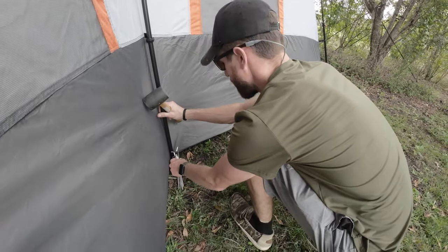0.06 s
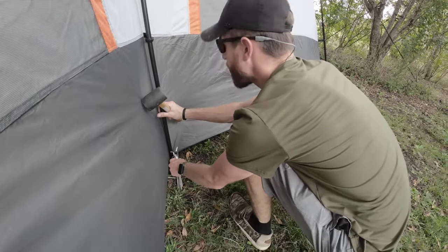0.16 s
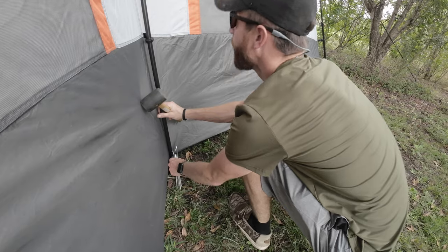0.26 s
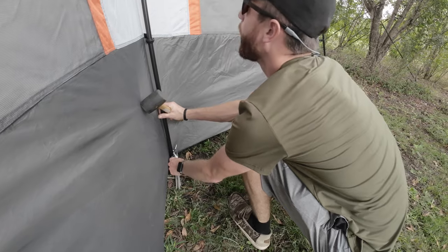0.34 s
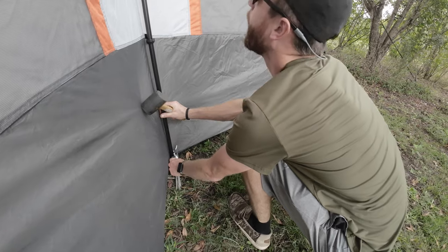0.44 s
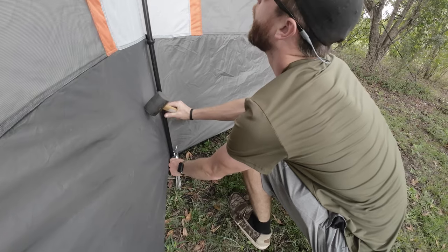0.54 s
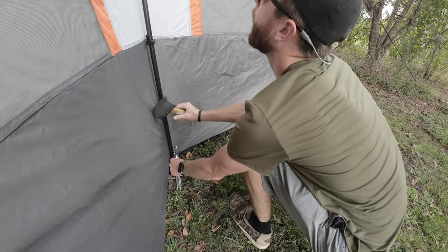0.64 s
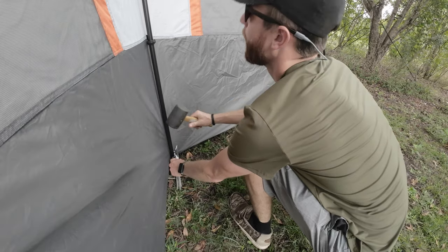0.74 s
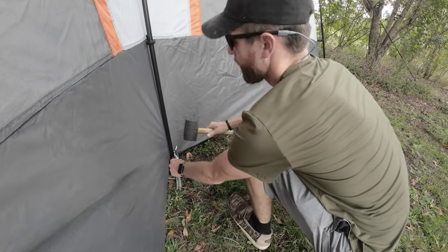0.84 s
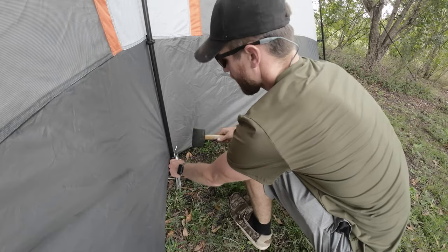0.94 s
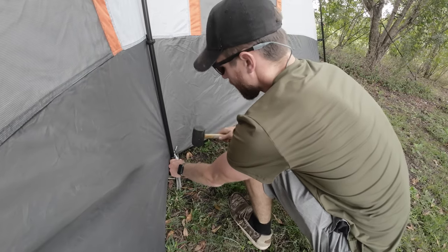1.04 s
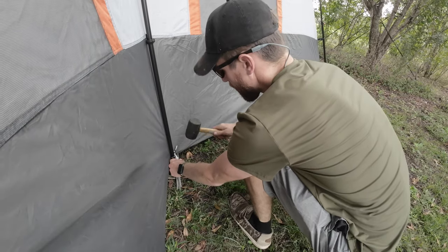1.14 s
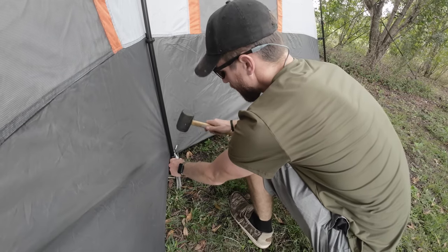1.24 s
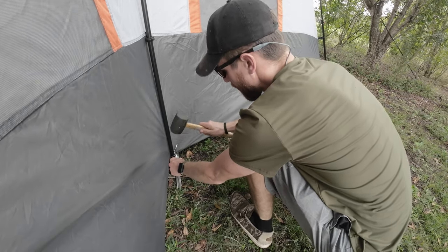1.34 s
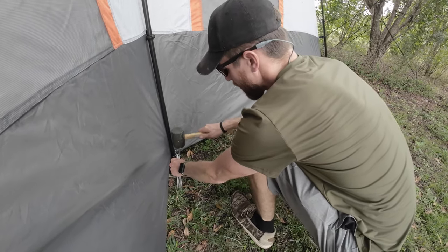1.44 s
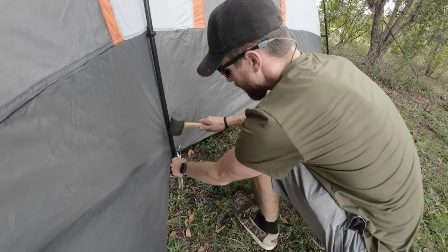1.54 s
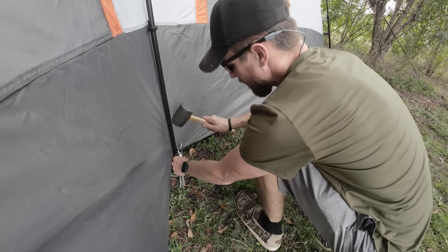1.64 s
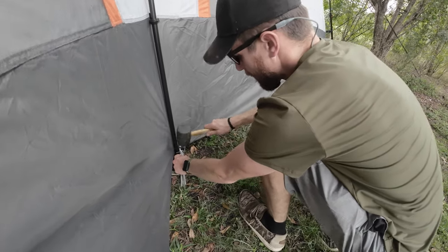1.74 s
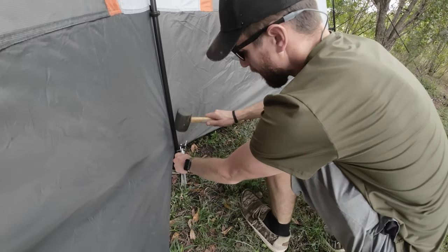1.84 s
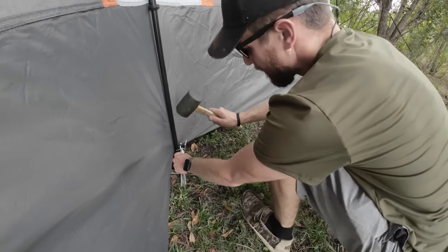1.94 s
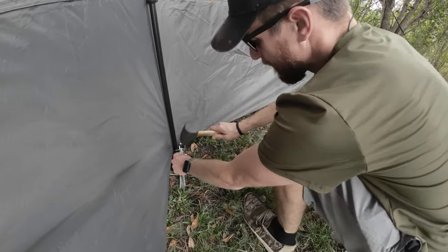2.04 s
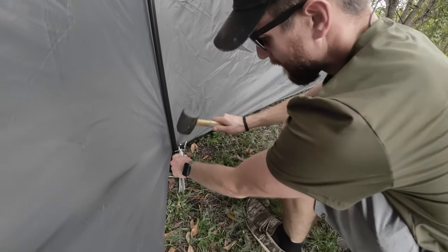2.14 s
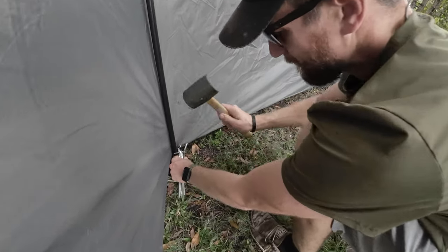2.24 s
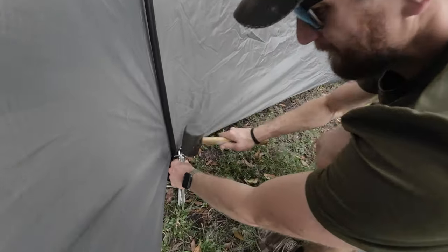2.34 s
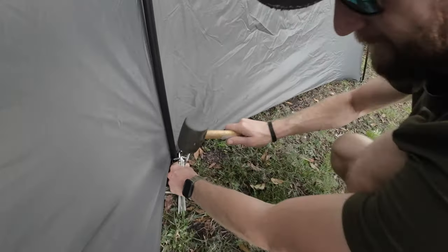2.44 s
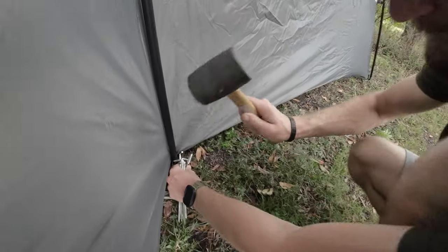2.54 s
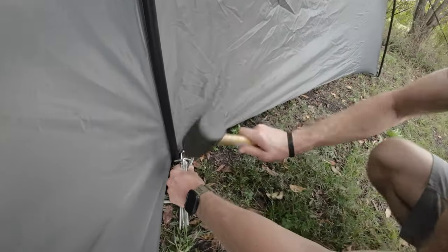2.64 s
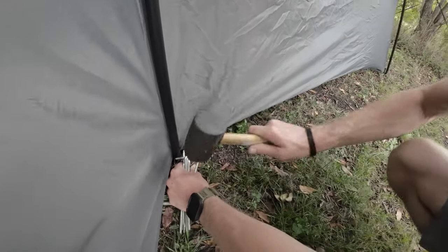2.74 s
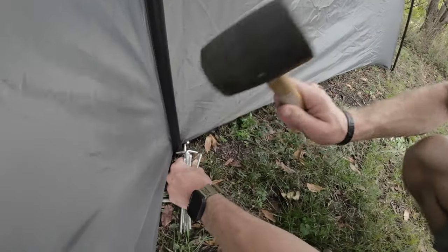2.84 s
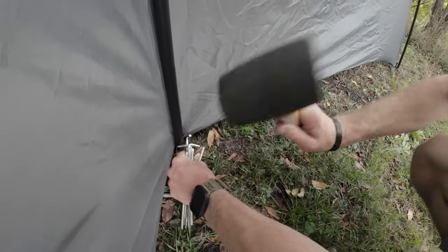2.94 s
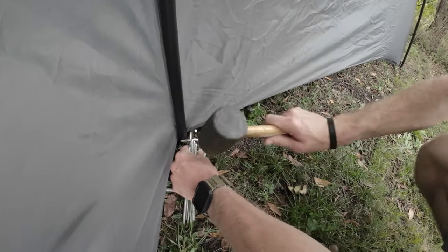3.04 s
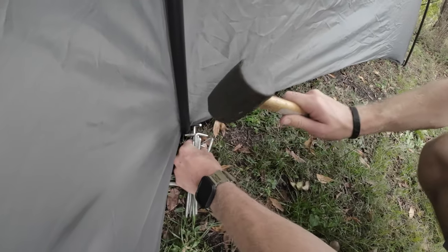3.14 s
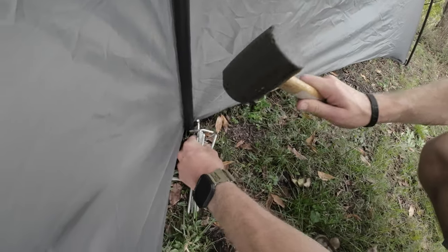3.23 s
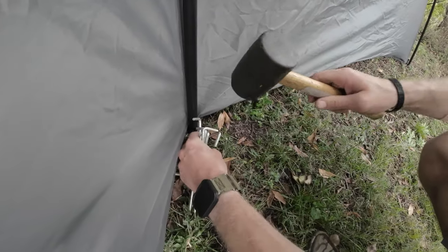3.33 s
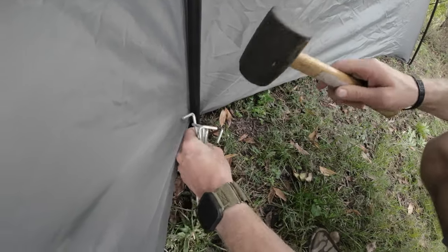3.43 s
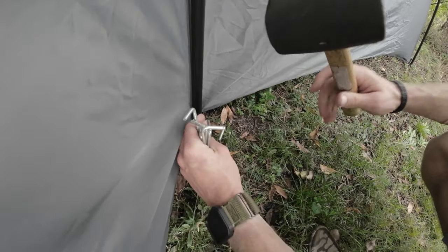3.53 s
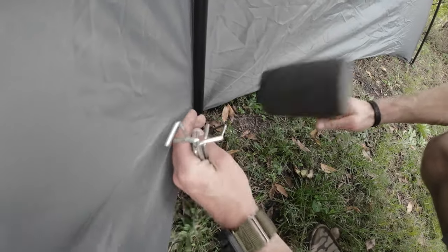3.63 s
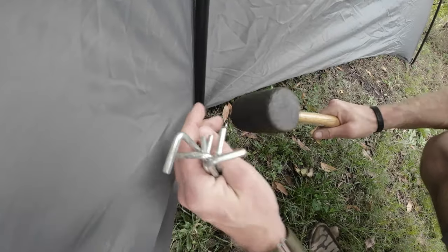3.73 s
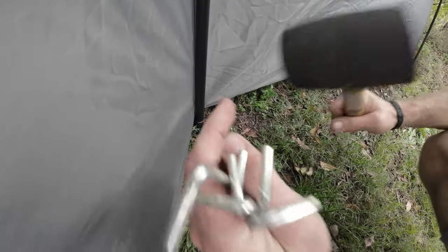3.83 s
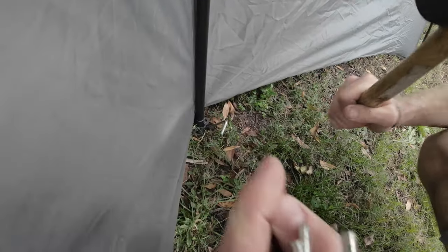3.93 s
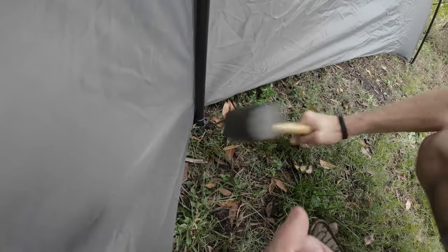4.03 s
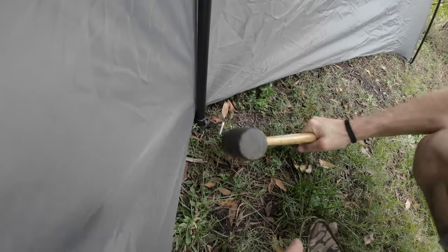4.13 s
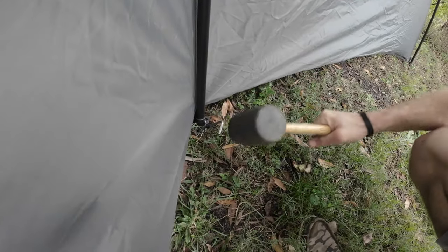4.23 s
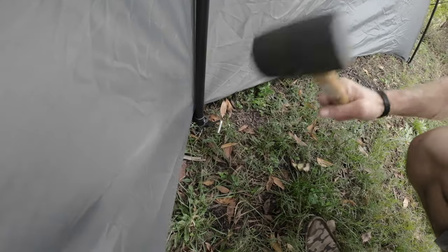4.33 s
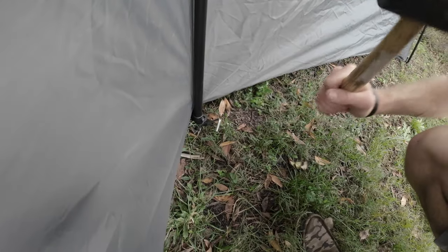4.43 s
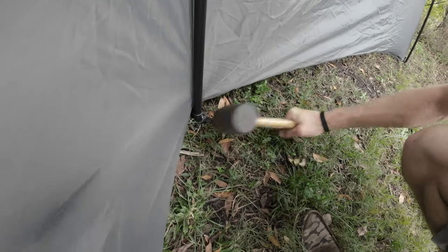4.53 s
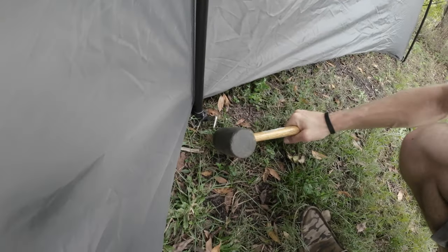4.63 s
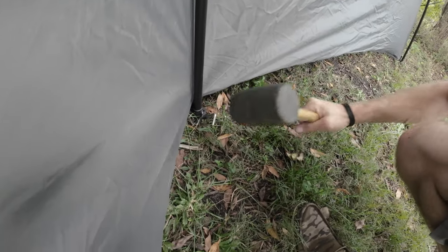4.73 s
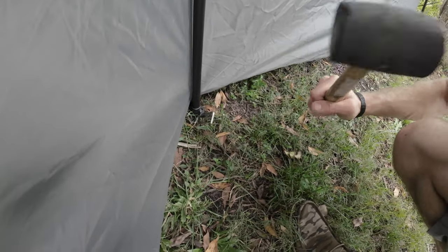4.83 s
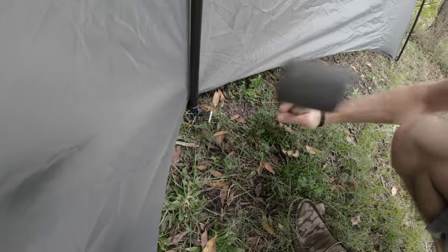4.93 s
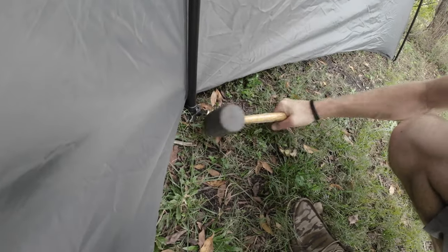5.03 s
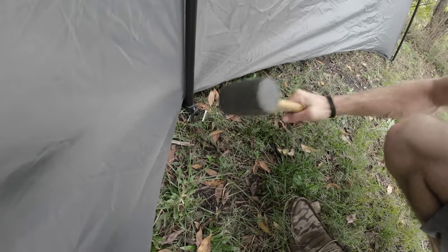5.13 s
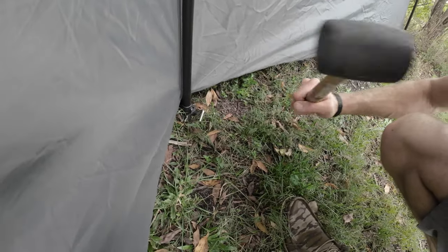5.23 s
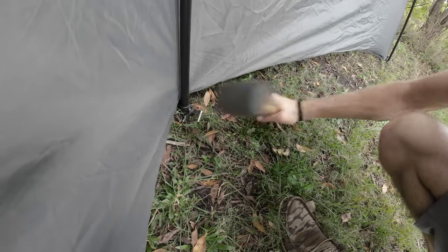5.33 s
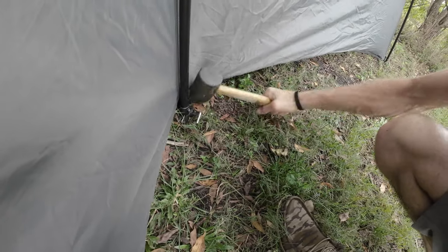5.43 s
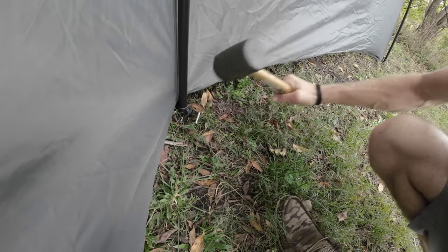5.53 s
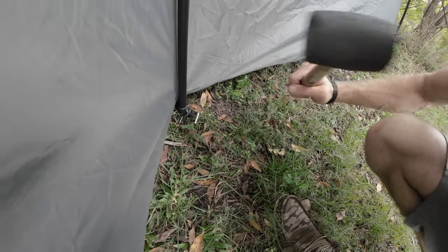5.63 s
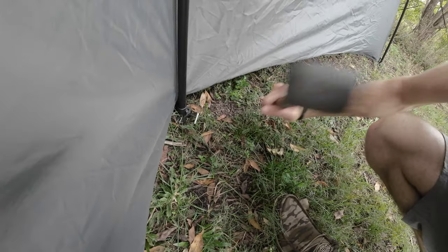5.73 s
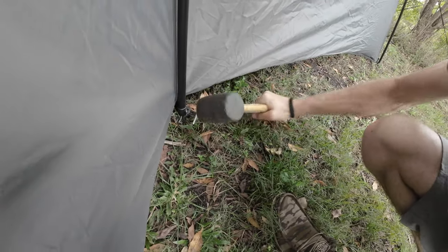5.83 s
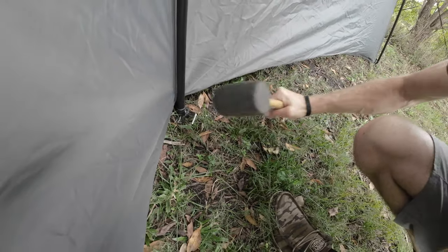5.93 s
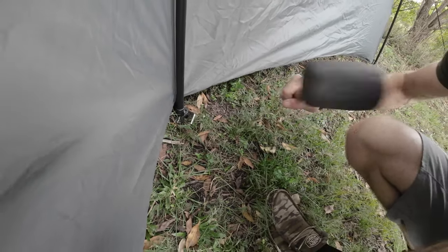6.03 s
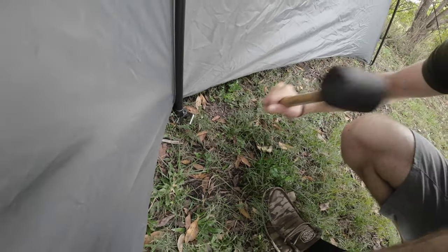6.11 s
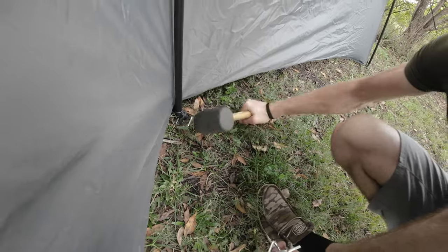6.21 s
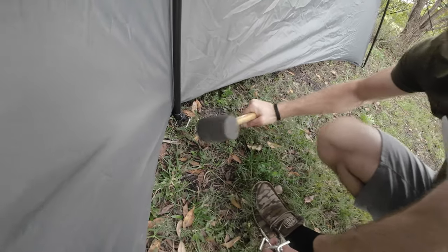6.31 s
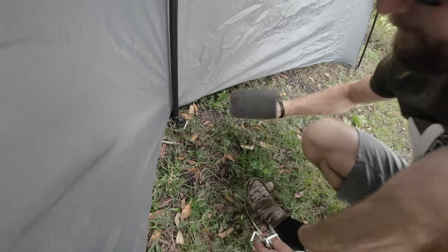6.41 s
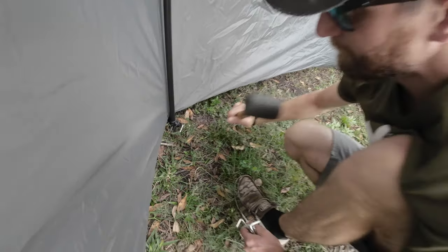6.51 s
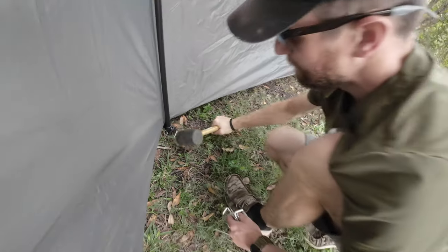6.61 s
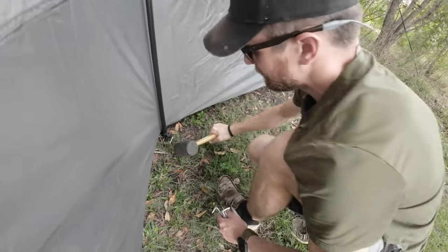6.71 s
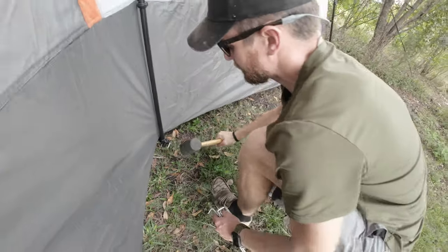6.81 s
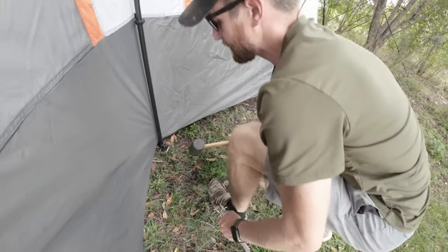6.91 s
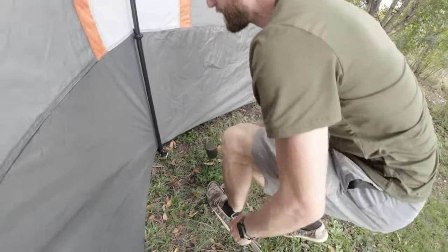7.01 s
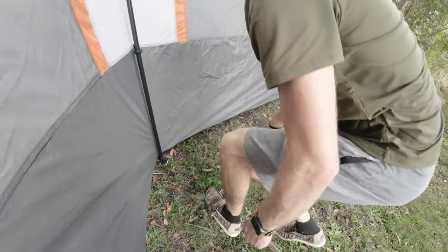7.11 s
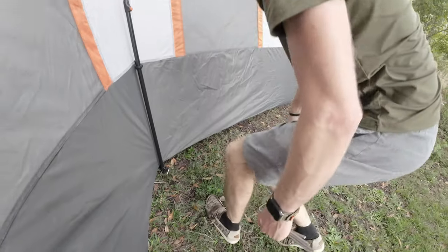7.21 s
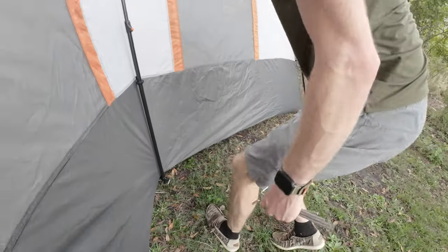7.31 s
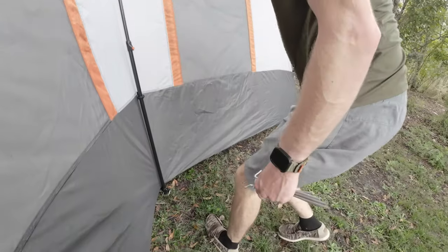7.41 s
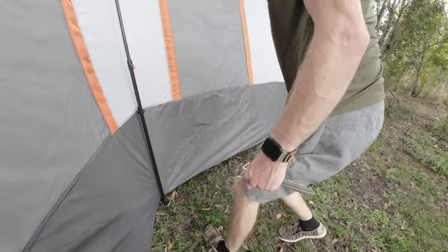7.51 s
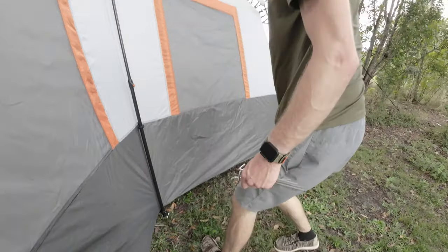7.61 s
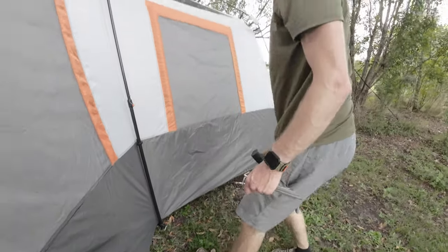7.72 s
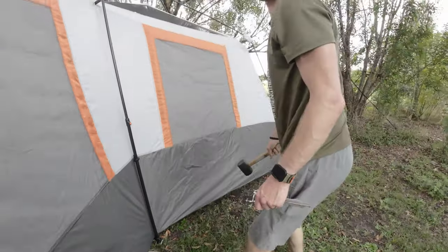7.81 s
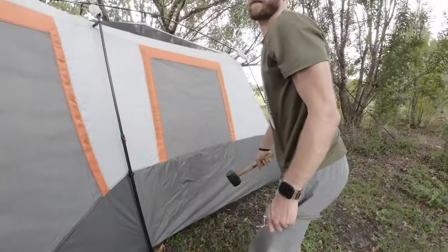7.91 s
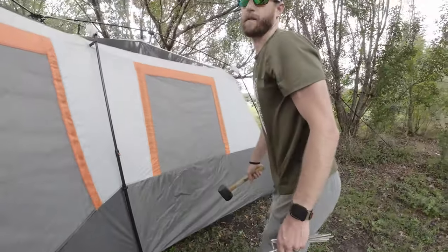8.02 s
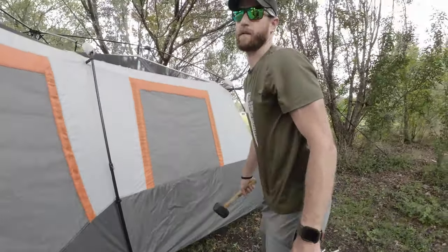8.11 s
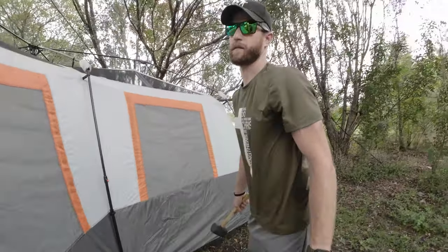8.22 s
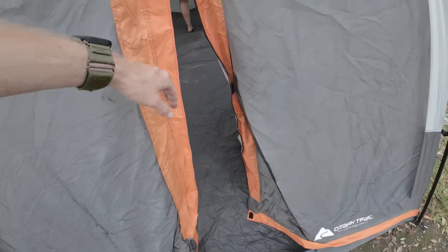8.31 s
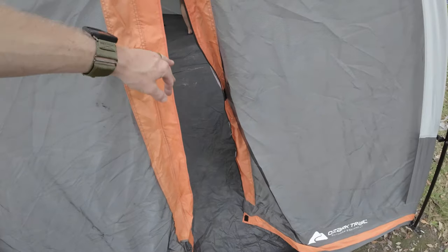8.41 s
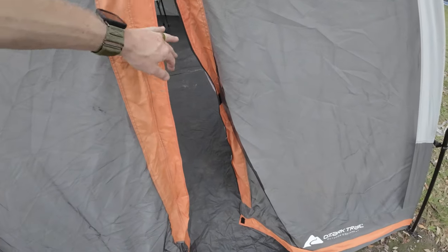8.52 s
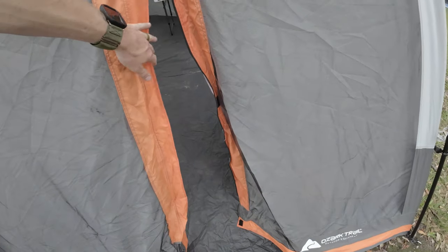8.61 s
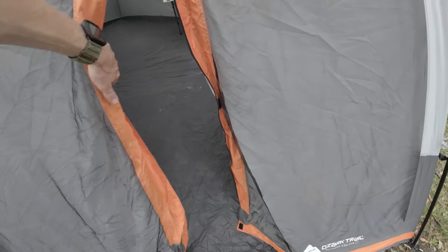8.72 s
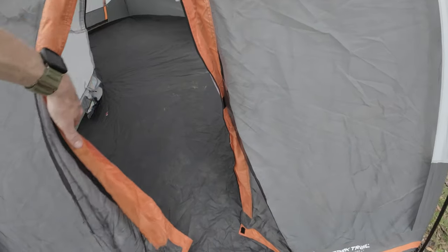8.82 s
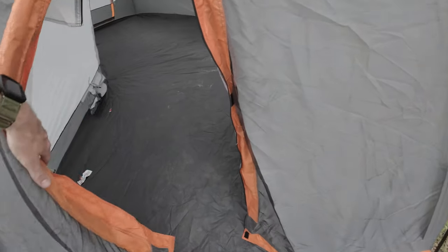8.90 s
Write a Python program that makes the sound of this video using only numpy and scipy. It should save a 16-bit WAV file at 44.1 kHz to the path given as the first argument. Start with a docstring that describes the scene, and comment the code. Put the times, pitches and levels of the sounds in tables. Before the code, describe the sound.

Dull mallet thwacks drive a steel peg into grassy ground, with bright metallic jingles from handheld pegs, fabric rustling and a soft breeze.

```python
"""A grassy campsite: a rubber mallet drives a steel tent stake into the soil, in two runs of blows.
Each blow layers a contact pulse, damped knock, clack and crack modes, and a soft soil thud.
Spare stakes bunched in the other hand clink, rattle and ring on: struck modes and grainy chatter.
Tent cloth and clothes rustle as the camper moves, with grit crunches and soft low bumps.
Shaped noise makes the bed: a light wind rumbles and stirs the trees."""
import sys
import numpy as np
from scipy import signal
from scipy.fft import rfft, irfft, next_fast_len
from scipy.io import wavfile

SR = 44100
rng = np.random.default_rng(int(sys.argv[2]) if len(sys.argv) > 2 else 0)


def int16_out(signal):
    """Quantize to a 16-bit WAV file."""
    q = np.round(np.clip(np.atleast_2d(signal).T, -1, 1) * 32767)
    wavfile.write(sys.argv[1], SR, q.astype(np.int16))


N = 394995
TIME = np.arange(N) / SR   # s

# Levels in the tables are relative: the functions add their trims.
# the breeze: [t/s, rumble level/dB, trees level/dB]
BREEZE = [(0.0, -39, -45), (0.87, -36, -44), (5.01, -35.5, -48.5), (5.31, -34.5, -48.5), (6.23, -34.5, -47),
          (7.76, -33.5, -43), (8.96, -33.5, -44)]
# colour of the wind rumble: [f/Hz, density level/dB]
RUMBLE_SPECTRUM = [(20, -1.5), (35, 6.5), (50, -0.5), (70, 3.5), (95, -4.5), (130, -3), (170, -6),
                   (240, -14.5), (400, -20.5), (3000, -88)]
# colour of the stirred trees: [f/Hz, density level/dB]
TREES_SPECTRUM = [(150, 9), (330, -1.5), (550, -1), (900, -1.5), (1400, -6.5), (2000, -14), (3000, -18),
                  (4300, -26), (5500, -22), (8000, -40.5), (11000, -38), (15000, -52)]
# how alike left and right are in the breeze: [f/Hz, likeness from 0 to 1]
LIKENESS = [(25, .05), (70, 0.98), (130, 1), (1000, .99), (12000, 0.58)]

# movements that rub the cloth: [t/s, length/s, level/dB]
STROKES = [(0.096, 0.43, -58.5), (1.714, 0.29, -52.5), (2.2, 0.23, -48), (2.595, 0.043, -62),
           (3.316, 0.18, -48.5), (3.501, 0.21, -44.5), (6.577, 0.63, -60.5), (7.386, 0.088, -50.5),
           (7.56, 0.41, -51.5), (7.938, .33, -57.5), (8.344, 0.55, -63.5), (8.683, .3, -49)]
STROKE_ATTACK_S, STROKE_RELEASE_S, CLOTH_REST_DB = 0.076, 0.072, -67.5
# colour of rubbing fabric: [f/Hz, density level/dB]
CLOTH_SPECTRUM = [(400, -7.5), (2500, 1), (4500, 1.5), (7000, 4), (9000, 0.5), (11000, 7.5), (15500, -4)]
# soft low bumps: [t/s, level/dB, f/Hz, t60/s]
BUMPS = [(1.811, -20, 44, 0.22), (3.1, -27, 91.8, 0.15), (4.145, -12, 36.7, 0.16),
         (4.644, -11.5, 44.7, 0.092), (8.528, -12.5, 69.4, 0.059), (8.925, -16.5, 69.5, 0.21)]
# grit and dry leaves crunching and scuffing: [t/s, level/dB, length/s]
CRUNCHES = [(0.128, -30.5, 0.0067), (0.34, -47, 0.43), (3.282, -43.5, 0.15), (3.632, -55, .04),
            (4.651, -32, 0.033), (4.682, -49, 0.063), (5.476, -28.5, 0.022), (5.494, -32, 0.075),
            (7.598, -42, 0.087), (7.79, -40, 0.02), (7.841, -34, 0.0059), (7.852, -44, 0.085),
            (8.692, -40.5, 0.47)]
# colour of the grit: [f/Hz, density level/dB]
GRIT_SPECTRUM = [(400, 8), (1200, 1), (2500, 4), (4000, -2), (11000, -2), (16000, -7)]

# stakes touching as they are handled, or chattering late after a blow:
# [t/s, level/dB, treble tilt/dB per octave, share of the free ring length, rebound level/dB]
STRAY_CLINKS = [(0.1306, -16, -10, 0.52, -17), (.329, -23, -3, .75, -28), (.4, -21, -17, 0.71, 3.5),
                (3.124, -22, -22, 0.66, -17), (3.373, -12, 12, .35, -7.5), (3.635, -13, 3, .45, 0),
                (3.728, -14, 5.5, 0.24, 1), (4.669, -13.5, 8, 1.34, -6.5), (8.063, -27.5, 11, 1.7, -19),
                (8.11, -23, 14, 1, -8.5), (8.194, -24.5, 5, .9, -19)]
# bending modes of the bunched stakes, before detuning and damping: [f/Hz, level/dB, free t60/s]
STAKE_MODES = [(4260, -18.5, .12), (4570, -28.5, .1), (4750, -7.5, .04), (5160, -5, 0.021),
               (5128, -6, 0.083), (5460, -5.5, 0.054), (6030, -11, .11), (6620, -10.5, 0.076),
               (7160, -11, .04), (7454, -7, .07), (7400, -8, 0.04), (8190, -9, 0.07), (10380, -12, 0.075),
               (9900, -11.5, 0.085), (10900, -6, 0.04), (11440, -10.5, 0.12), (11970, -14, 0.0895),
               (12180, -8.5, 0.079), (14650, -5, 0.034), (15500, -22, .05)]
GRIP_SHARE = 0.56   # ring length of a clink after a blow, as a share of the free one
REBOUND_S = 0.018
# shifted in the fist, the bunch also gives a dull, damped clank
CLANK_HZ, CLANK_DB, CLANK_T60_S = 2910, -21.5, 0.039
# the clink trails each blow a little more than the last
CLINK_LAG_S, LAG_GROWTH_S_PER_BLOW = 0.0047, 0.001
# colour of the chatter: [f/Hz, density level/dB]
RATTLE_SPECTRUM = [(1500, 0), (4000, -4), (5200, 2), (7500, -3), (9200, -1.5), (11800, 4.5), (15500, -5.5)]
RATTLE_T60_S = 0.14
# two loosely held stakes ring out: [f/Hz, free t60/s]
LOOSE_STAKES = [(4176, 0.59), (4226, 1)]
# their short-lived upper modes: [f/Hz, level/dB, t60/s]
LOOSE_MODES = [(4350, -3, 0.1), (5460, -8, 0.12), (6000, -5.5, 0.11), (7100, -18, .12), (7800, -15, .12),
               (9900, -21, .09), (11800, -11.5, 0.14), (12160, -6.5, 0.2)]
# any swing above this level chafes against the neighbours and dies fast
CHAFE_DB, CHAFE_T60_S = -37.5, 0.17
CHOKE_S = 0.012   # the next clink stops a ring within this time

# mallet blows, and how the spare stakes answer each (the chatter follows the clack level):
# [t/s, strength level/dB, soil thud level/dB, knock level/dB, knock f/Hz, clack level/dB, crack f/Hz,
#  unused, clink level/dB, low stake's ring level/dB, high stake's ring level/dB]
BLOWS = [ (1.49, -12, -39, -49, 612, -33.5, 2200, -32, 1, -20.5, -22.5),
         (1.7943, -12.5, -27, -25.5, 666, -30, 2030, -29.5, -4.5, -47, -44.5),
         (2.111, -9.5, -21.5, -29.5, 600, -27.5, 2040, -27.5, -2, -38.5, -48),
         (2.4172, -6, -19, -23.5, 557, -21, 1850, -21, 1.5, -41, -48),
         (2.7415, -2.5, -14, -20, 540, -19, 1810, -15, 3.5, -47.5, -52),
         (3.0727, 0, -19, -22.5, 593, -25.5, 2050, -26.5, 0, -35.5, -51),
         (4.1177, -2.5, -25.5, -15.5, 702, -24.5, 2330, -24.5, -16, -69, -59),
         (4.6167, 6.5, -29, -19.5, 670, -25.5, 3190, -29, -33, -71, -58),
         (5.051, 4, -17, -35, 603, -16, 2580, -27, -21, -48, -57),
         (5.4323, 1, -10.5, -23, 608, -17, 2300, -19, -9.5, -42.5, -42.5),
         (5.8595, 2, -12.5, -19, 696, -16.5, 1950, -14, -8, -45, -38),
         (6.266, -2.5, -13.5, -21.5, 674, -15, 2100, -20, -8, -24, -29),
         (6.6603, -1.5, -11.5, -22, 625, -14, 2230, -14, -11, -22, -21.5)]
# the soil's damped swings, before a slight random detune: [f/Hz, level/dB, t60/s]
SOIL_MODES = [(223.4, -2, 0.033), (337.3, -2.5, .026)]
# the bright crack of impact: [ratio to the crack pitch, level/dB, t60/s]
CRACK_MODES = [(0.781, 1.5, 0.0033), (1, -0.5, 0.0068), (1.45, -5.5, 0.0037)]
KNOCK_T60_S, CLACK_T60_S = 0.03, 0.021
# the clack rises as the free end of the stake gets shorter: [t/s, f/Hz]
CLACK_PITCH = [(2.7, 784), (3.1, 1080), (5.05, 1160), (6.7, 1350)]

# reflections off ground and tent wall: [delay t/s, level/dB]
ECHOES = [(.0031, -15), (.0075, -23.5)]
PORT_LAG_S = 0.00002
# the microphone turns at the end: [t/s, left minus right level/dB]
BALANCE = [(0, 0), (7.2, 0), (8.96, 2)]
# the microphone's treble dip: [f/Hz, level/dB]
MIC_DIP = [(11500, -1.5), (12200, -10.5), (12900, -17.5), (13700, -16), (14800, -7.5), (15600, 1)]
CUTOFF_HZ = 15800


def from_db(db):
    """Decibels to gain."""
    return 10 ** (np.asarray(db) / 20)


def rms_one(x):
    """Scale to unit rms."""
    return x / np.sqrt(np.mean(x ** 2) + 1e-20)


def in_time(rows):
    """Each column of a curve at every sample."""
    s, *columns = np.transpose(rows)
    return [np.interp(TIME, s, column) for column in columns]


def at_hz(points, hz):
    """Read a spectrum on a log-frequency axis."""
    f, value = np.transpose(points)
    return np.interp(np.log(hz + 1e-3), np.log(f), value)


def butter(x, hz, kind):
    """Causal Butterworth filter designed at order two."""
    sos = signal.butter(2, np.minimum(hz, SR / 2 - 1), kind, fs=SR, output="sos")
    return signal.sosfilt(sos, x)


def add(track, s, sound):
    """Mix a sound into a track at time s."""
    i = max(round(s * SR), 0)
    track[i:i + len(sound)] += sound[:max(N - i, 0)]


def mode(hz, t60, phase=0):
    """A sine dying away under a height of 1, in a one-second buffer; phase may vary by sample."""
    t = TIME[:min(int(2 * t60 * SR), SR)]
    decay = np.exp(-np.log(1000) * t / t60)
    swing = np.sin(2 * np.pi * hz * t + np.broadcast_to(phase, SR)[:len(t)])
    return np.pad(decay * swing, (0, SR - len(t)))


def colour(x, spectrum):
    """Give a steady noise its spectrum; rms 1."""
    size = next_fast_len(N)
    gain = from_db(at_hz(spectrum, np.fft.rfftfreq(size, 1 / SR)))
    shaped = irfft(rfft(x, size) * gain, size)
    return rms_one(shaped[..., :N])


def stereo_noise(spectrum):
    """Coloured noise whose left-right likeness varies with frequency, from a mid and a side noise."""
    size = next_fast_len(N)
    alike = np.clip(at_hz(LIKENESS, np.fft.rfftfreq(size, 1 / SR)), 0, 0.999)
    mid, side = rfft(rng.standard_normal((2, size)))
    shared = np.sqrt(1 + alike) * mid
    opposed = np.sqrt(1 - alike) * side * [[1], [-1]]
    return colour(irfft(shared + opposed, size), spectrum)


def grains(per_s, spread_db):
    """Random tiny contacts of uneven size."""
    sizes = from_db(spread_db * np.minimum(rng.exponential(1, N), 4))
    contacts = rng.random(N) < per_s / SR
    return rms_one(sizes * rng.standard_normal(N) * contacts)


def flutter(per_s):
    """Slow random wander of rms 1, drawn between random knots."""
    knots = rng.standard_normal(int(per_s * N / SR) + 2)
    return rms_one(np.interp(TIME * per_s, np.arange(len(knots)), knots))


def wind(level_db, trim_db=4, gust_db=2.07):
    """Moving air rumbles: low noise whose level wanders with the gusts."""
    gusts = from_db(level_db + trim_db + gust_db * flutter(9))
    return gusts * butter(stereo_noise(RUMBLE_SPECTRUM), 12, "high")


def leaves(level_db, trim_db=5.5, stir_db=1.39):
    """Stirred trees: a wide noise bed with a quicker flutter of its own."""
    stirring = from_db(level_db + trim_db + stir_db * flutter(14))
    return stirring * stereo_noise(TREES_SPECTRUM)


def cloth(level_db=2, crackle_db=-7):
    """Fabric slides in uneven strokes that swell, hold and fade, and its creases crackle."""
    rub = from_db(CLOTH_REST_DB)
    for s, length, db in STROKES:
        swell = np.clip((TIME - s) / STROKE_ATTACK_S, 0, 1)
        fade = np.clip(1 - (TIME - s - length) / STROKE_RELEASE_S, 0, 1)
        rub = rub + from_db(db) * swell * fade
    catching = from_db(2.2 * flutter(45))
    creases = from_db(crackle_db) * grains(250, 4.0)
    fabric = colour(grains(14000, 1.9) + creases, CLOTH_SPECTRUM)
    return from_db(level_db) * rub * catching * fabric


def bumps():
    """Low, quickly damped swings."""
    out = np.zeros(N)
    for s, db, hz, t60 in BUMPS:
        add(out, s, from_db(db) * mode(hz, t60))
    return butter(out, 240, "low")


def crunches():
    """Grit and leaves under pressure: coarse grains in bursts that swell and fade."""
    pressure = np.zeros(N)
    for s, db, length in CRUNCHES:
        arch = np.sin(np.pi * np.minimum(TIME[:SR] / length, 1))
        add(pressure, s, from_db(db) * np.sqrt(np.abs(arch)))
    return pressure * colour(grains(4000, 1.7), GRIT_SPECTRUM)


def stake(tilt_db, share, detune=0.0046):
    """One touch on one stake: every mode gets its own strength and a slightly different pitch."""
    out = 0
    for hz, db, t60 in STAKE_MODES:
        tilt = tilt_db * np.log2(hz / 7000)
        strength = from_db(db + tilt + 3 * rng.normal())
        pitch = hz * (1 + detune * rng.normal())
        out = out + strength * mode(pitch, t60 * max(share, 0.1), rng.uniform(0, 2 * np.pi))
    return out


def touch(tilt_db, share, tick_db=12, tick_t60=0.01, tick_low_hz=3800, bounce_s=0.0015):
    """A gritty tick that rings two stakes, one just after the other."""
    decay = from_db(tick_db - 60 * np.minimum(TIME[:SR] / tick_t60, 10))
    tick = decay * butter(rng.standard_normal(SR), [tick_low_hz, 11000], "band")
    second = np.pad(stake(tilt_db, share), (round(bounce_s * SR), 0))[:SR]
    return tick + stake(tilt_db, share) + second


def clink_times():
    """When the spare stakes touch after each blow."""
    return [s + CLINK_LAG_S + LAG_GROWTH_S_PER_BLOW * number for number, (s, *_) in enumerate(BLOWS)]


def clinks(jolted_db=-17, jolted_tilt_db=1.0, tilt_per_db=0.5, dullest_tilt_db=-7, stray_db=-17):
    """Stakes touch after each blow, brighter when louder; stray clinks clank, touch and rebound."""
    out = np.zeros(N)
    for s, (*_, db, _, _) in zip(clink_times(), BLOWS):
        tilt_db = max(jolted_tilt_db + tilt_per_db * db, dullest_tilt_db)
        add(out, s, from_db(db + jolted_db) * touch(tilt_db, GRIP_SHARE))
    for s, db, tilt_db, share, rebound_db in STRAY_CLINKS:
        add(out, s, from_db(db + CLANK_DB) * mode(CLANK_HZ, CLANK_T60_S))
        add(out, s, from_db(db + stray_db) * touch(tilt_db, share))
        rebound = from_db(db + stray_db + rebound_db) * touch(tilt_db, share)
        add(out, s + REBOUND_S, rebound)
    return out


def rattle(level_db=-1, build_s=0.0022, metal_db=-8, held_share=0.49):
    """The jolted bunch chatters for a moment after each blow and rings its hand-damped stakes."""
    out, t = np.zeros(N), TIME[:SR]
    chatter = colour(grains(6000, 1.7), RATTLE_SPECTRUM)
    for s, _, _, _, _, clack, *_ in BLOWS:
        decay = from_db(clack + level_db - 60 * t / RATTLE_T60_S)
        jolt = decay * (1 - np.exp(-t / build_s))
        burst = jolt * chatter[round(s * SR):][:SR]
        metal = stake(0, held_share)
        add(out, s, burst)
        add(out, s, from_db(metal_db) * signal.fftconvolve(burst, metal / np.linalg.norm(metal)))
    return out


def rings(level_db=0, sharp_hz=130, settle_s=0.023):
    """After each clink two nearly equal stakes ring and beat until the next, starting sharp."""
    out, t, starts = np.zeros(N), TIME[:SR], clink_times()
    # still pressed by its neighbours, each stake starts sharp_hz high and settles
    glide = 2 * np.pi * sharp_hz * settle_s * (1 - np.exp(-t / settle_s))
    for s, until, (*_, low_db, high_db) in zip(starts, starts[1:] + [TIME[-1]], BLOWS):
        ring, swings = 0, from_db([low_db, high_db])
        for (hz, t60), swing in zip(LOOSE_STAKES, swings):
            free = min(swing, from_db(CHAFE_DB))
            phase = glide + rng.uniform(0, 2 * np.pi)
            ring = ring + free * mode(hz, t60, phase)
            ring = ring + (swing - free) * mode(hz, CHAFE_T60_S, phase)
        for hz, db, t60 in LOOSE_MODES:
            strength = np.hypot(*swings) * from_db(db)
            ring = ring + strength * mode(hz, t60, rng.uniform(0, 2 * np.pi))
        choke = np.clip(1 - (s + t - until) / CHOKE_S, 0, 1)
        add(out, s, ring * choke)
    return from_db(level_db) * out


def mallet(thud_db=11, knock_db=7, clack_db=7, crack_db=-9, contact_db=-3, contact_s=0.00037,
           rise_hz=5000, give_s=0.0014, soil_hz=900, catch_s=0.003475, catch_db=-8):
    """A short contact pulse with the knock of head and stake; the soil thuds a moment later."""
    out = np.zeros(N)
    for s, strength, thud, knock, knock_hz, clack, crack_hz, *_ in BLOWS:
        clack_hz = np.interp(s, *np.transpose(CLACK_PITCH))
        # a quarter-turn phase starts each mode at its peak
        blow = from_db(knock + knock_db) * mode(knock_hz, KNOCK_T60_S, np.pi / 2)
        blow += from_db(clack + clack_db) * mode(clack_hz, CLACK_T60_S, np.pi / 2)
        for ratio, db, t60 in CRACK_MODES:
            blow += from_db(strength + crack_db + db) * mode(crack_hz * ratio, t60, np.pi / 2)
        contact = np.sin(np.pi * np.minimum(TIME[:SR] / contact_s, 1))
        blow += from_db(strength + contact_db) * contact
        add(out, s, butter(blow, rise_hz, "low"))
        # the stake slips, then catches in the soil with a second, duller knock
        add(out, s + catch_s, from_db(catch_db) * butter(blow, 2 * soil_hz, "low"))
        # the soil gives way, so its swing starts negative
        soil = np.zeros(SR)
        for hz, db, t60 in SOIL_MODES:
            pitch = hz * (1 + rng.normal(0, 0.004))
            soil -= from_db(thud + thud_db + db) * mode(pitch, t60)
        add(out, s + give_s, butter(soil, soil_hz, "low"))
    return butter(out, 130, "high")


def campsite(x, scatter_db=-24, scatter_t60=0.067, wall_hz=2500):
    """Two dull near echoes and a faint, short scatter from the surroundings."""
    out, dull = x.copy(), butter(x, wall_hz, "low")
    for s, db in ECHOES:
        add(out, s, from_db(db) * dull)
    t = TIME[:SR // 2]
    tail = butter(rng.standard_normal(len(t)), 10000, "low") * from_db(-60 * t / scatter_t60)
    scatter = signal.fftconvolve(x, tail / np.linalg.norm(tail))[:N]
    return out + from_db(scatter_db) * scatter


def two_ports(x):
    """Near sounds reach the right microphone port slightly later."""
    size = next_fast_len(N)
    lag = np.exp(-2j * np.pi * np.fft.rfftfreq(size, 1 / SR) * PORT_LAG_S)
    late = irfft(rfft(x, size) * lag, size)[:N]
    return np.array([x, late])


def scene():
    """Hammering and cloth close by, the breeze all round."""
    rumble_db, trees_db = in_time(BREEZE)
    balance_db, = in_time(BALANCE)
    breeze = wind(rumble_db) + leaves(trees_db)
    work = two_ports(cloth() + crunches() + clinks() + rattle() + mallet())
    near = np.array([campsite(side) for side in work])
    near = near + two_ports(bumps() + rings())   # these stay free of echoes
    return (breeze + near) * from_db(balance_db * [[0.5], [-0.5]])


def record(dry):
    """The microphone dips in the high treble, clips peaks beyond full scale and cuts the top."""
    hz = np.linspace(0, SR / 2, 257)
    dip = signal.firwin2(65, hz, from_db(at_hz(MIC_DIP, hz)), fs=SR)
    heard = signal.fftconvolve(dry, dip[None], "same")
    top_cut = signal.ellip(10, 0.1, 70, CUTOFF_HZ, fs=SR, output="sos")
    return signal.sosfilt(top_cut, np.clip(heard, -1, 1))


dry = scene()
out = record(dry)
int16_out(out)
```